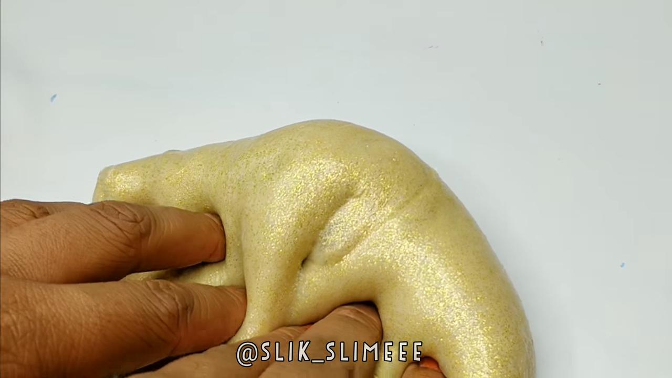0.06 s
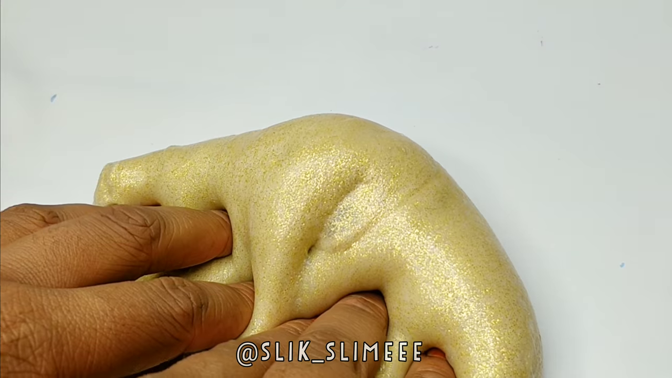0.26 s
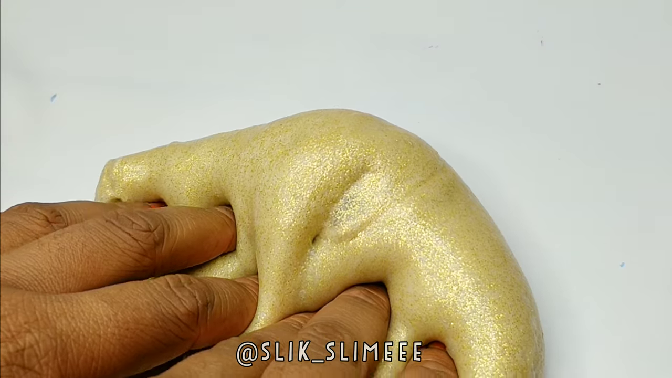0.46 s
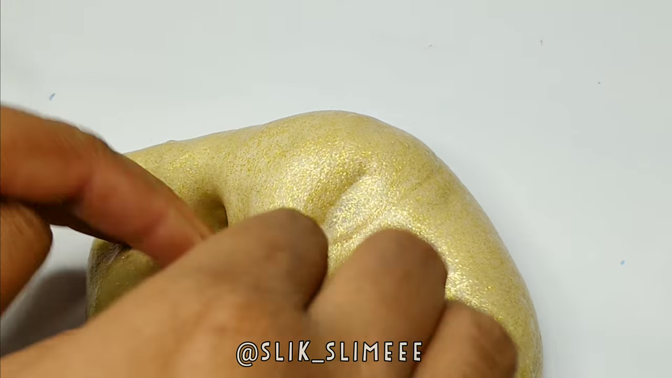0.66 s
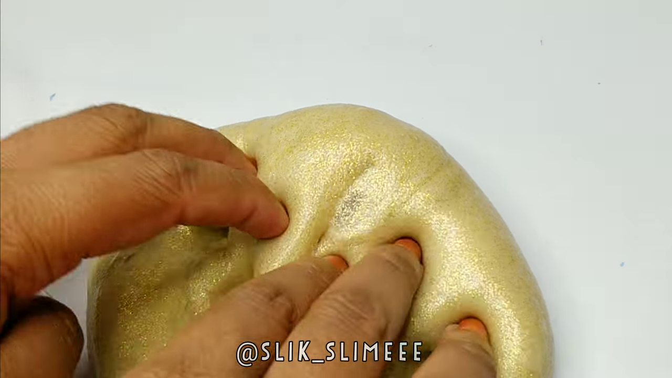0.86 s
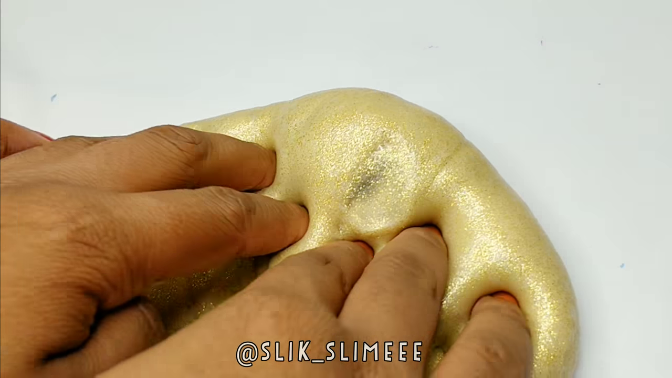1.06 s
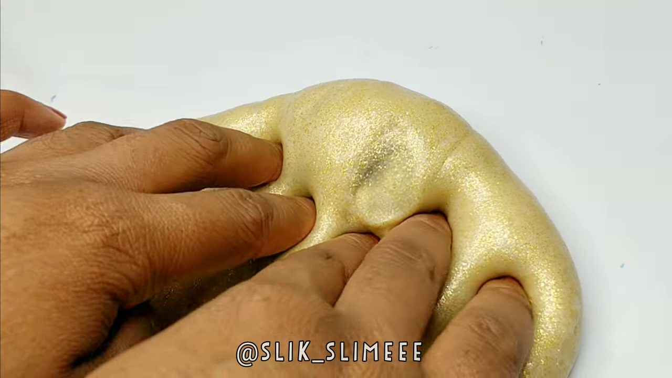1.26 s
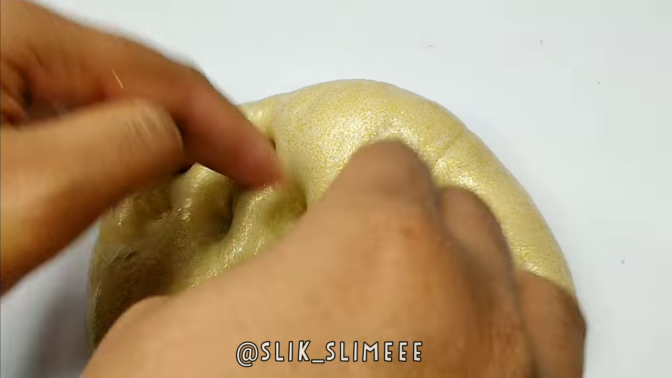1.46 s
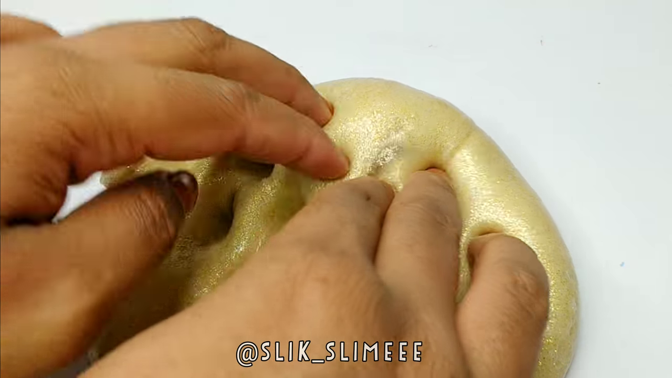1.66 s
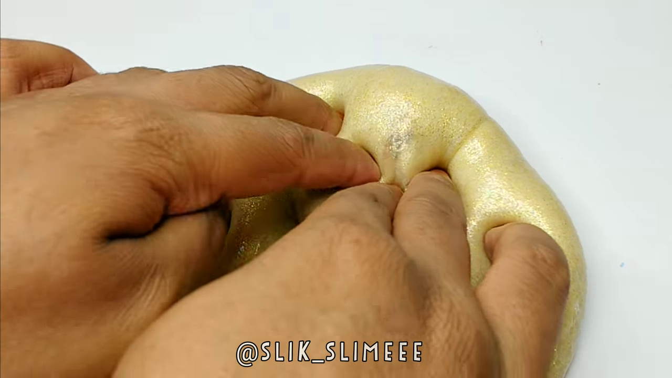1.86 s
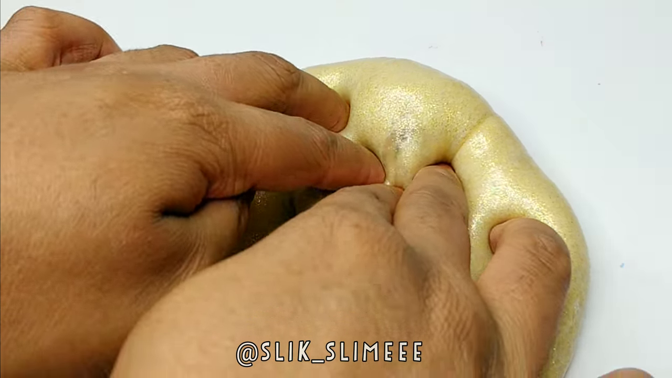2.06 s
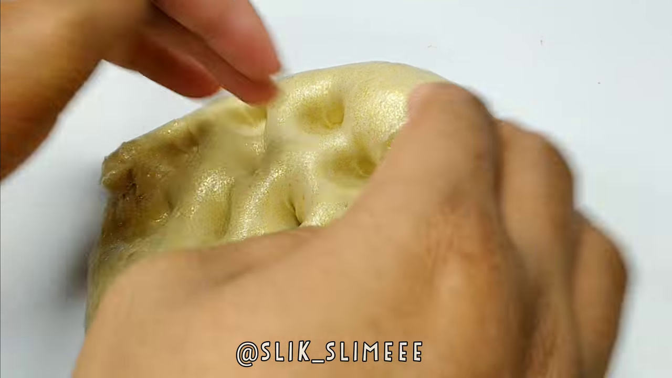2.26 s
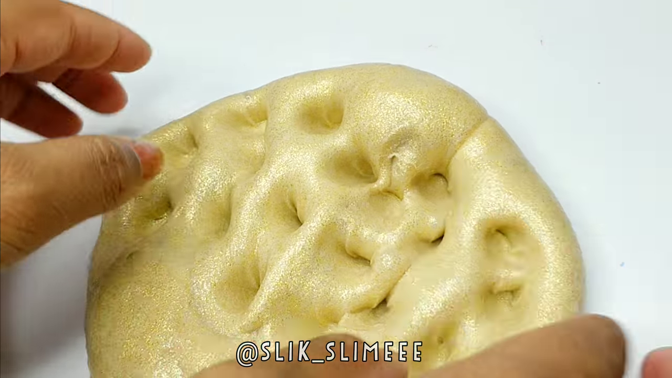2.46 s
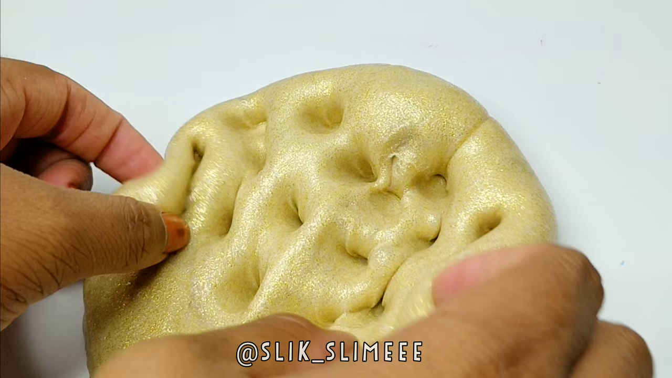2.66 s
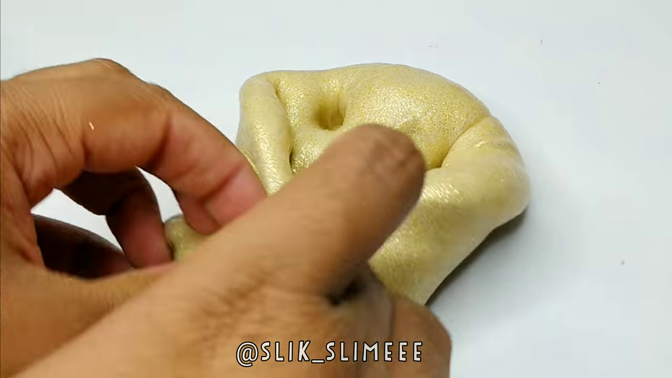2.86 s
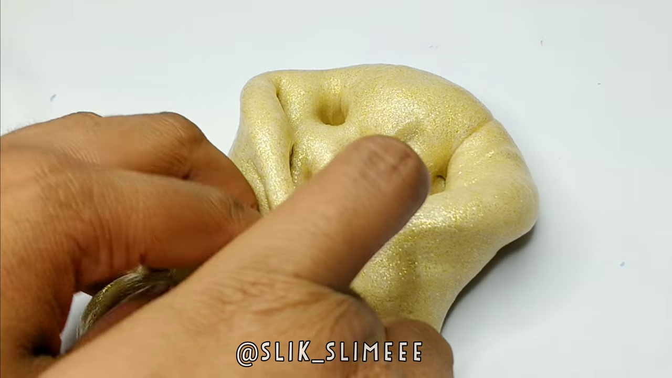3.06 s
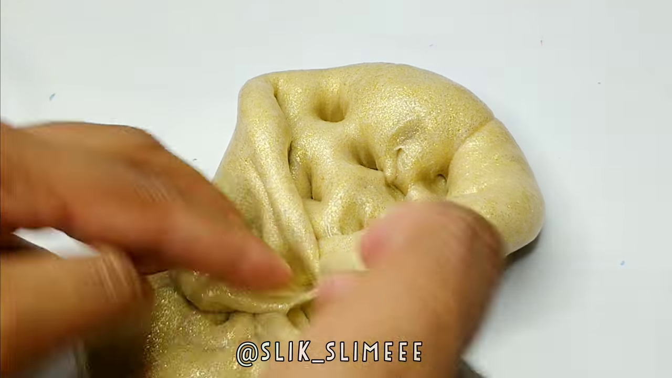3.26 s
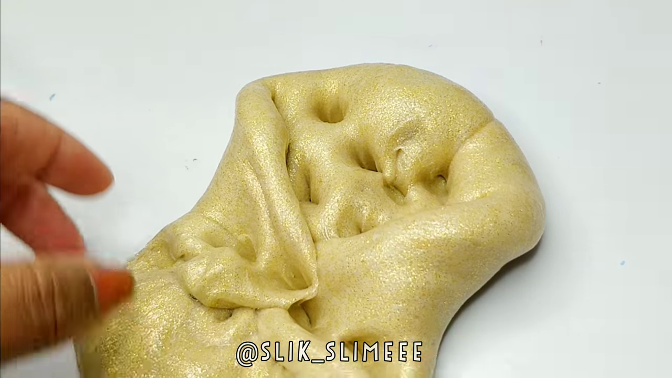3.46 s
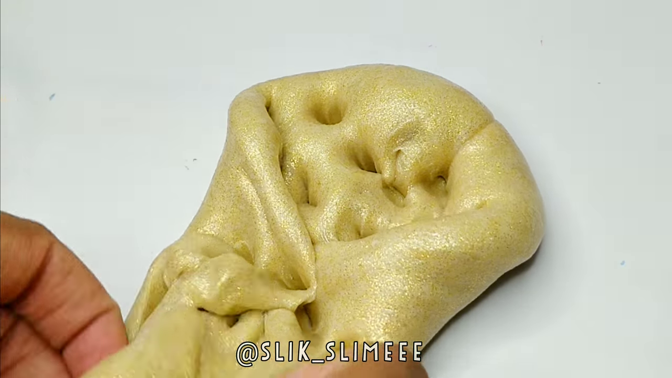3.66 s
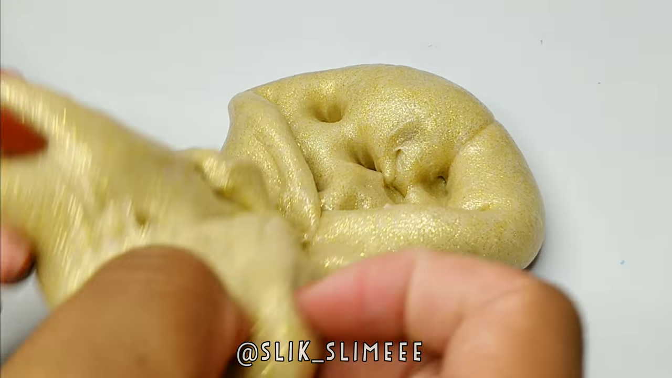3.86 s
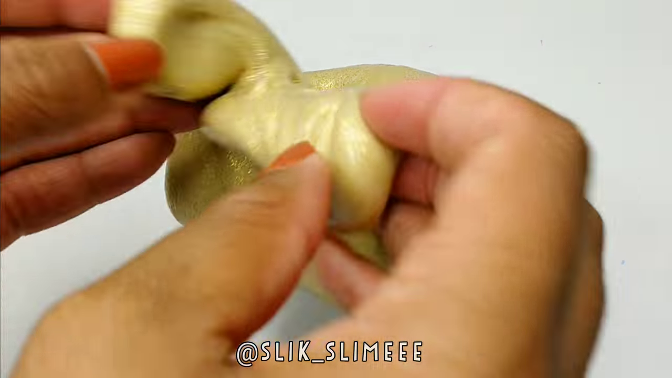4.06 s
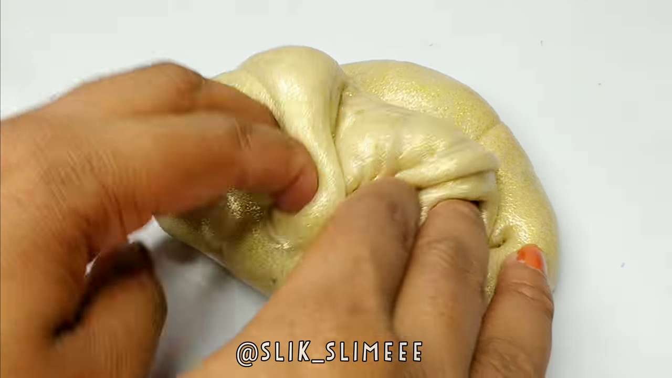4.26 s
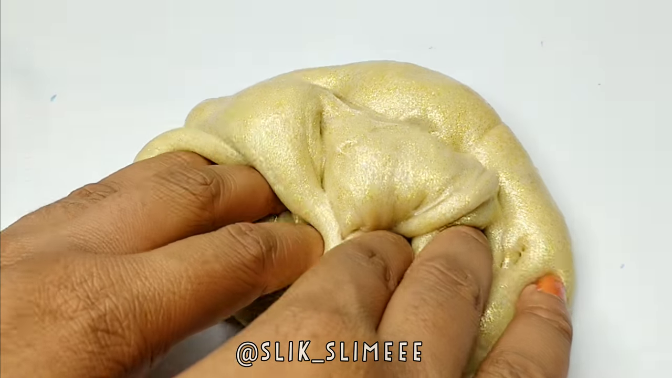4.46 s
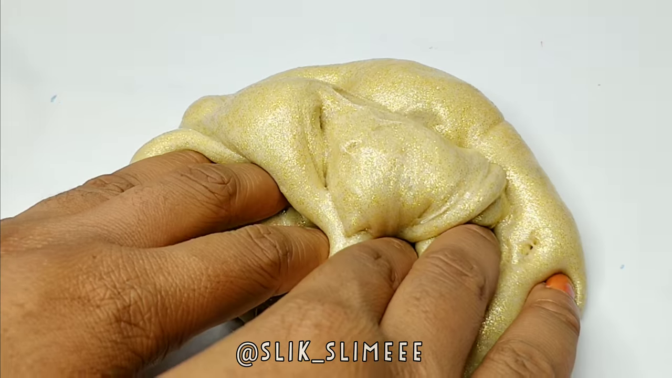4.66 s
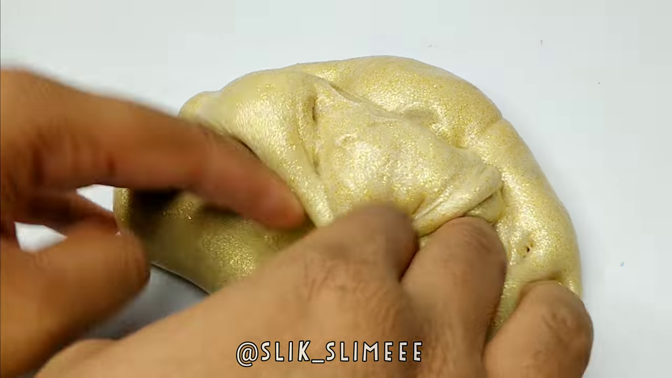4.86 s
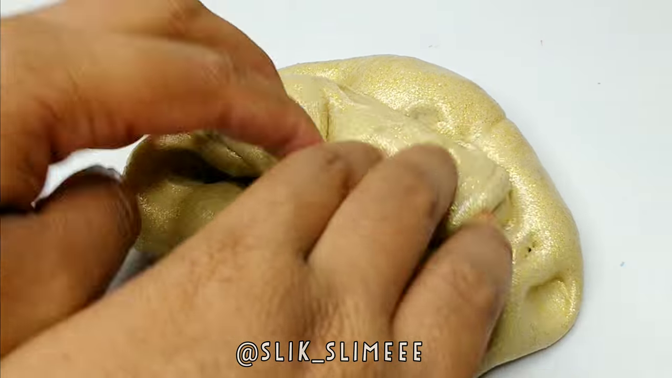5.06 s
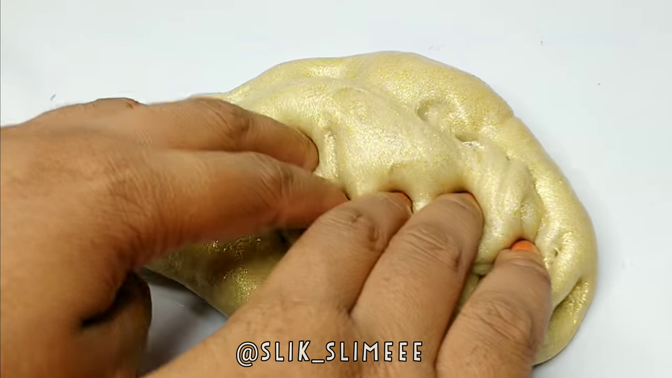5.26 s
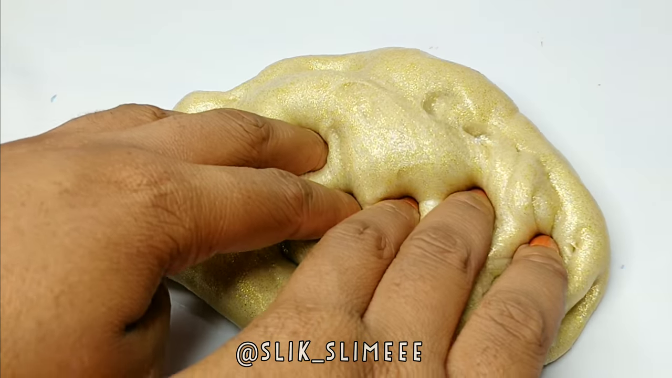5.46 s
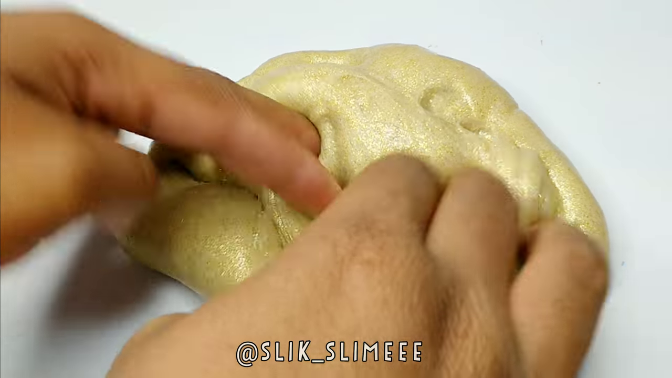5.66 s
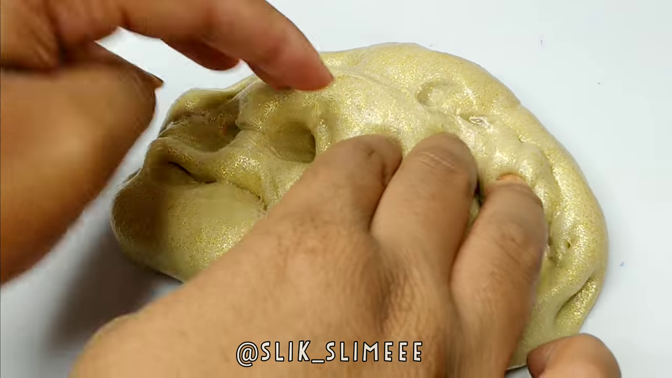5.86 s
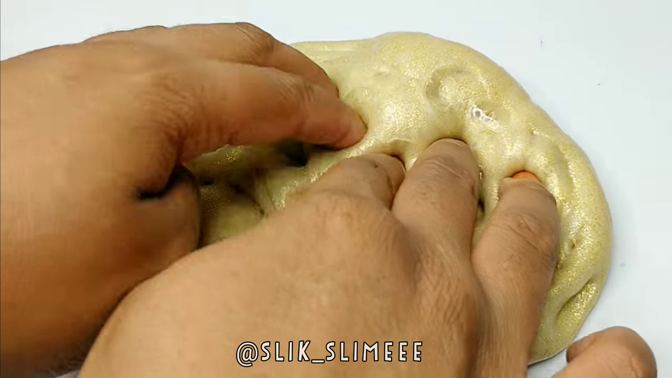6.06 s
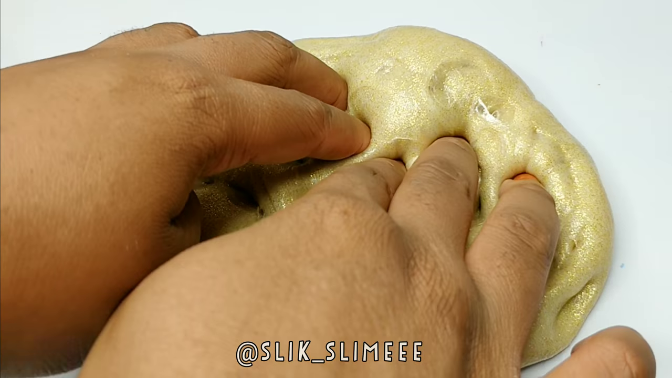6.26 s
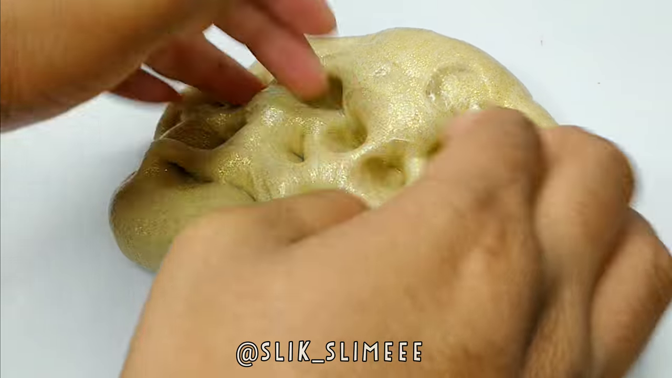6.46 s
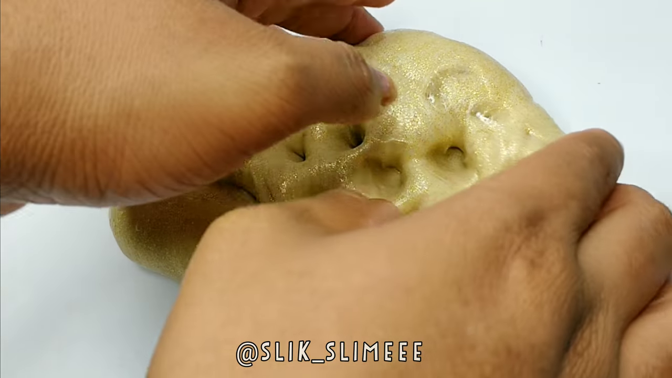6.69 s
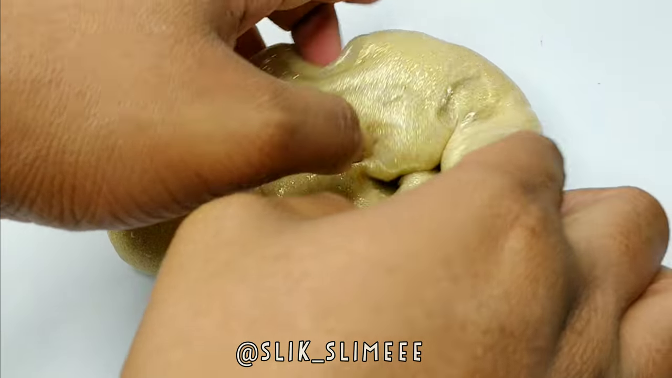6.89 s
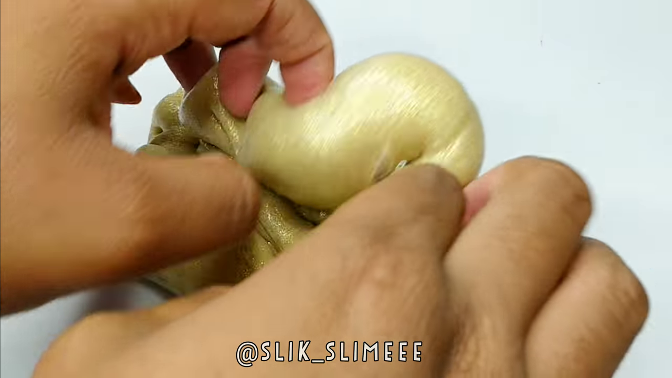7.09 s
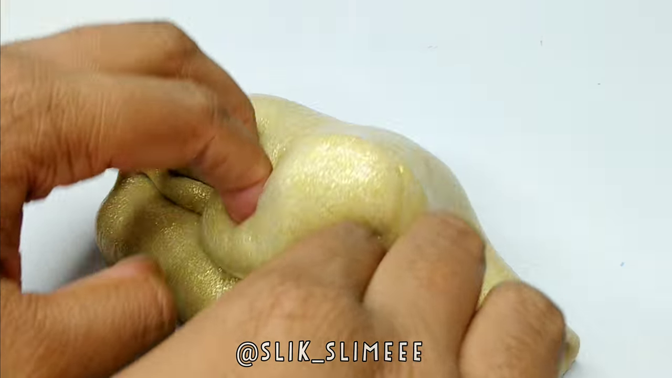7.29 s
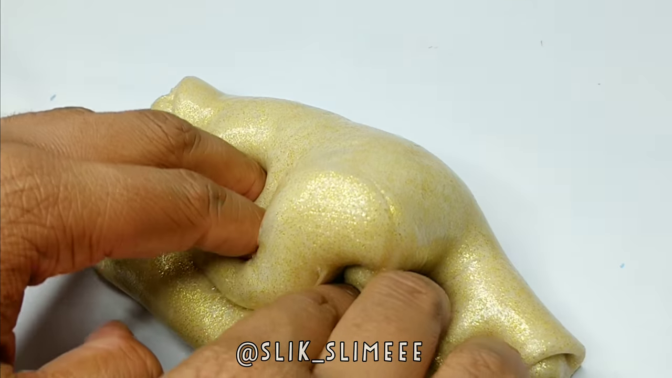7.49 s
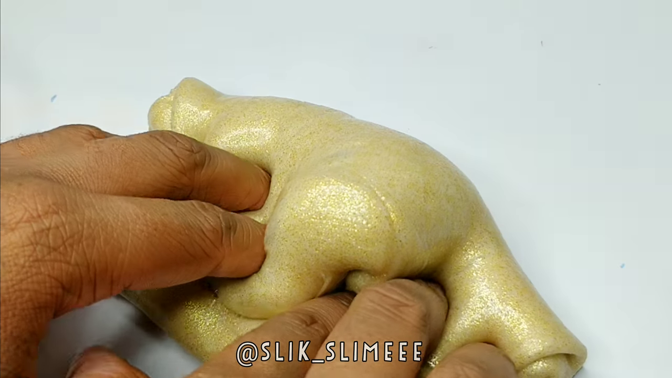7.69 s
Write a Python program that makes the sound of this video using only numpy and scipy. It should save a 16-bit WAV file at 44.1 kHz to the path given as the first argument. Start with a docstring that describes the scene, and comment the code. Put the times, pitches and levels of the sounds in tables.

```python
"""Fingers knead sticky slime on a table, close to a phone in a small room.
Each time they pull out, air pockets snap open, gulp air and thud the table: films crack and cavities ring.
Trapped bubbles tick under pressure, and soft squishes and a wet crackle of tiny bubbles fill in.
Between the pops the slime peels off the table and the skin with a soft fizz of snapping threads.
Underneath lies a faint steady rumble and hiss of filtered noise."""
import sys
import numpy as np
from scipy import signal
from scipy.fft import rfft, irfft
from scipy.io import wavfile
from scipy.ndimage import uniform_filter1d

SR = 44100
rng = np.random.default_rng(int(sys.argv[2]) if len(sys.argv) > 2 else 0)


def store_pcm(level_fs):
    """Save levels as 16-bit WAV."""
    pcm = np.round(np.clip(level_fs, -1, 1) * 32767).astype(np.int16)
    wavfile.write(sys.argv[1], SR, np.atleast_2d(pcm).T)


N = 340893  # length in samples

# A finger pulls free of its hole. Each row: start in seconds, length of the swell before it in seconds,
# starting bubble pitch in Hz, cycles the bubble rings, bubble level in dB, film crack level in dB,
# hole pitch in Hz before tuning, gulp level in dB, starting jolt pitch in Hz, table thud level in dB,
# left minus right in dB.
RELEASES = [(0.6867, 0.034, 4770, 3, -29, -61, 710, -30.5, 187, -26, 0),
            (0.717, 0.0092, 2900, 1.4, -29.5, -40.5, 477, -26.5, 172, -28, 1),
            (1.512, .032, 1730, 3.7, -38, -35, 640, -26.5, 190, -27, 11),
            (1.5472, 0.023, 2440, 1.03, -22.5, -33.5, 690, -26, 190, -26.5, 6),
            (2.2757, 0.019, 1970, 3.2, -41.5, -47, 776, -29, 380, -26, 9),
            (2.2999, 0.014, 1980, 1.5, -39, -45.5, 517, -32, 184, -34, 3),
            (2.3612, 0.034, 2260, 3.6, -59, -73, 364, -34.5, 165, -34, 8),
            (2.539, 0.0025, 2570, 22, -37, -46, 360, -36.5, 400, -64, -23.5),
            (2.5589, 0.0042, 3750, 2.3, -37.5, -55, 525, -30.5, 179, -38, 15.5),
            (3.192, 0.0025, 2080, 4.5, -46, -76, 440, -38, 180, -35.5, 5),
            (3.375, 0.014, 2100, 1.7, -36.5, -41.5, 950, -40, 177, -34.5, 8),
            (3.4082, .005, 2090, 2.5, -37.5, -34, 720, -41, 170, -35.5, 0),
            (3.6254, 0.0083, 3200, 2.3, -45, -64, 580, -33, 346, -66, 9),
            (4.2892, 0.0055, 3070, 6.2, -34, -37.5, 760, -36.5, 530, -41.5, -6.5),
            (4.9542, 0.007, 4310, 9, -21.5, -31.5, 660, -27, 215, -26, 9.5),
            (4.99, 0.043, 4350, 2, -25.5, -46.5, 970, -25.5, 360, -29, 4),
            (5.754, 0.0023, 4540, 3.5, -38, -41.5, 563, -28, 320, -28.5, 4.5),
            (5.8022, 0.011, 3360, 18, -38.5, -42, 746, -29.5, 168, -34.5, 2),
            (6.5027, 0.0066, 4450, 4.6, -43, -31, 740, -28, 337, -30, 3),
            (6.5367, 0.0028, 2350, 1.8, -28, -33, 935, -31, 189, -29.5, 10),
            (6.7369, 0.0055, 4800, 5, -41.5, -66, 565, -40, 274, -50, -14)]
BURST_S = .005  # burst levels are rms over this time
PORT_LAG_S = .00041  # longest travel time from one microphone port to the other
BEARING_DEG, BEARING_SPREAD_DEG = 28.3, 8.1  # the hands work left of the phone


def undb(db):
    """Turn decibels into gain."""
    return 10 ** (np.asarray(db) / 20)


def unit(x):
    """Scale to rms 1."""
    return x / np.sqrt(np.mean(x ** 2))


def burst(x, db):
    """Give a short sound its level, judged by its total energy."""
    return x * undb(db) * np.sqrt(BURST_S * SR / np.sum(x ** 2))


def add(out, s, x):
    """Mix x into out from time s in seconds."""
    i = max(int(s * SR), 0)
    out[..., i:i + x.shape[-1]] += x[..., :out.shape[-1] - i]


def along(points, hz):
    """Read between (Hz, value) points on a log-frequency axis."""
    f, value = np.transpose(points)
    return np.interp(np.log(hz + 1e-9), np.log(f), value)


def colour(x, points):
    """Filter with the given (Hz, dB) shape, never answering before the sound arrives."""
    size = 8192
    cepstrum = irfft(np.log(undb(along(points, np.fft.rfftfreq(size, 1 / SR)))))
    # folding the cepstrum onto its first half makes the filter minimum-phase
    cepstrum[1:size // 2] *= 2
    cepstrum[size // 2 + 1:] = 0
    response = irfft(np.exp(rfft(cepstrum)))
    response = response.reshape((1,) * (x.ndim - 1) + (-1,))
    return signal.fftconvolve(x, response, axes=-1)[..., :x.shape[-1]]


def diffuse(size, apart_hz=1300):
    """Noise from all sides: the two ports share the bass and differ in the treble."""
    mid, side = rfft(rng.standard_normal((2, size)))
    alike = .96 / (1 + (np.fft.rfftfreq(size, 1 / SR) / apart_hz) ** 2)
    mid = mid * np.sqrt((1 + alike) / 2)
    side = side * np.sqrt((1 - alike) / 2)
    return irfft(np.array([mid + side, mid - side]), size)


def ring(t, hz, cycles, glide):
    """A cavity swells within a cycle and rings down 60 dB; its pitch slides as it opens."""
    age = t * hz / cycles  # reaches 1 when the ring is 60 dB down
    swell = 1 - np.exp(-2 * t * hz)
    wave = np.sin(2 * np.pi * hz * t * (1 + glide * np.minimum(age, 1)))
    return -swell * wave * np.exp(-np.log(1000) * age)


def background():
    """A faint steady rumble and hiss: noise from all sides, strongest in the bass."""
    # Each row: frequency in Hz, level in dB.
    quiet_colour = [(20, -6.5), (27, 1), (36, -12), (50, -16.5), (100, -17), (210, -18), (320, -23),
                    (700, -26), (1400, -31), (3000, -32.5), (5500, -36), (9000, -41.5), (13000, -39),
                    (16000, -46.5)]
    return undb(-62) * unit(colour(diffuse(N), quiet_colour))


def room(x, tail_db=-1.5, near_db=5, near_s=0.0046):
    """Near surfaces answer first; the walls add a short tail that lasts longest in the bass."""
    # Decay of the walls. Each row: frequency in Hz, time to fall 60 dB in seconds.
    decay_times = [(100, 0.9), (250, 0.12), (600, 0.25), (1500, 0.28), (4000, 0.26), (12000, 0.21)]
    # Colour of the room's answer. Each row: frequency in Hz, level in dB.
    wall_colour = [(60, -39), (150, -6), (400, -9), (1000, -7.5), (2000, -5.5), (4500, -3.5), (8000, -3.5),
                   (12000, -1), (16000, -6.5)]
    size = int(SR / 2)
    t, hz = np.arange(size) / SR, np.fft.rfftfreq(size, 1 / SR)
    noise = rfft(diffuse(size))
    octave = np.round(np.log2(np.maximum(hz, 64)))
    tail = 0
    for band in np.unique(octave):
        fade = np.exp(-np.log(1000) * t / along(decay_times, 2 ** band))
        tail = tail + irfft(noise * (octave == band), size) * fade
    arrival = (1 - np.exp(-t / 0.0017)) * undb(near_db * np.exp(-t / near_s))
    response = colour(unit(tail) * arrival, wall_colour) / np.sqrt(size)
    return undb(tail_db) * signal.fftconvolve(x, response, axes=-1)[:, :N]


def scatter(x, db, spread_s):
    """The moving hands and the table top throw back each sound in a new way."""
    t = np.arange(int(SR / 40)) / SR
    reflections = diffuse(len(t)) * np.sqrt(t) * np.exp(-t / spread_s)
    echoes = signal.fftconvolve(x[None], reflections, axes=-1)
    # set the echo energy relative to the sound itself
    return undb(db) * echoes * np.sqrt(2 * np.sum(x ** 2) / np.sum(echoes ** 2))


def stroke(age, hold_s):
    """Gain of one drag: the pull builds up, holds, then the slime relaxes."""
    attack_s, release_db_per_s = 0.048, 115
    relaxed_s = np.maximum(age - attack_s - hold_s, 0)
    return np.clip(age / attack_s, 0, 1) * undb(-release_db_per_s * relaxed_s)


def pinholes(per_s=60):
    """Pinhead bubbles open in the peeling layer; each has its own size and place."""
    t, out = np.arange(int(SR / 50)) / SR, 0
    for hz in np.geomspace(1300, 7000, 11):
        # per_s counts the bubbles at each pitch
        hits = (rng.random(N) < per_s / SR) * rng.uniform(.2, 1, (2, N))
        bubble = ring(t, hz, cycles=9, glide=.1)
        out = out + signal.oaconvolve(hits, bubble[None], axes=-1)[:, :N]
    return unit(out)


def peeling(pinhole_db=-7, flutter_db=0.33):
    """In each drag threads snap over a dull rub; a short swell of fizz and rub leads into each release."""
    # The slime is dragged and peels.
    # Each row: start in seconds, hold in seconds, fizz level in dB, rub level in dB.
    strokes = [(0.0, 0.0072, -68.5, -76), (0.977, 0.19, -70.5, -72.5), (1.84, 0.075, -70.5, -78),
               (2.628, 0.2, -57.5, -60), (3.605, 0.029, -51.5, -50), (3.783, 0.12, -57.5, -66.5),
               (4.07, 0.14, -66.5, -91), (6.789, 0.31, -62.5, -59.5), (6.91, 0.018, -59.5, -57)]
    # Colour of the snapping threads. Each row: frequency in Hz, level in dB.
    fizz_colour = [(500, -11.5), (1000, -13), (1800, -11.5), (3000, -4), (4500, -6), (6500, -12.5),
                   (9000, -13.5), (11500, -10), (14000, -19), (16000, -43)]
    # Colour of the rubbing mass. Each row: frequency in Hz, level in dB.
    rub_colour = [(35, -51), (70, 9), (110, 4.5), (210, 4), (400, -2.5), (800, -3.5), (1600, -12.5),
                  (3000, -48)]
    threads_per_s, thread_spread_db = 8000, 2
    swell_db = [-19.5, -18]  # fizz and rub of the swell, relative to the gulp
    now, gains = np.arange(N) / SR, np.zeros((2, N))
    for s, hold_s, fizz_db, rub_db in strokes:
        drag = np.outer(undb([fizz_db, rub_db]), stroke(now - s, hold_s))
        gains = np.hypot(gains, drag)
    for s, lead_s, _, _, _, _, _, gulp_db, *_ in RELEASES:
        # the swell fades out by the release
        swell = undb(gulp_db) * np.hanning(int(lead_s * SR))
        add(gains, s - lead_s, np.outer(undb(swell_db), swell))
    # a few threads are much stronger than the rest
    sizes = undb(thread_spread_db * np.minimum(rng.exponential(size=N), 6))
    threads = (rng.random(N) < threads_per_s / SR) * sizes * rng.standard_normal((2, N))
    grain = unit(colour(threads, fizz_colour)) + undb(pinhole_db) * pinholes()
    # the peeling front catches and slips
    flutter = unit(uniform_filter1d(rng.standard_normal(N), size=700))
    fizz_gain, rub_gain = gains * undb(flutter_db * flutter)
    return fizz_gain * grain + rub_gain * unit(colour(diffuse(N), rub_colour))


def squishes(cycles=5):
    """A little air slips along a resting finger: a soft blip with no crack."""
    # Each row: start in seconds, starting pitch in Hz, level in dB.
    blips = [(3.293, 490, -56.5), (3.934, 720, -54), (4.515, 860, -54.5), (4.575, 766, -57.5),
             (5.452, 510, -60), (5.868, 870, -48), (6.2, 580, -53.5), (6.97, 1400, -52)]
    out, t = np.zeros(N), np.arange(int(SR / 20)) / SR
    for s, hz, db in blips:
        add(out, s, burst(ring(t, hz, cycles, glide=0.093), db))
    return out


def squelch(crackle_db, spread_s, centre_hz, octaves, count):
    """After each release the hole's wet wall comes apart in tiny bubbles, the late ones weakest."""
    out, t = np.zeros((2, N)), np.arange(int(SR / 100)) / SR
    for s, _, _, _, bubble_db, _, _, gulp_db, *_ in RELEASES:
        suction_db = (bubble_db + gulp_db) / 2
        for when, pitch, size, place in np.clip(rng.standard_normal((count, 4)), -2, 2):
            hz = min(centre_hz * 2 ** (octaves * pitch), SR / 4)
            level_db = suction_db + crackle_db + 3 * size - 4 * abs(when)
            bubble = burst(ring(t, hz, cycles=4, glide=.1), level_db)
            sides = undb([2 * place, -2 * place])
            add(out, s + spread_s * abs(when), np.outer(sides, bubble))
    return out


def thuds(low_hz=68):
    """Each release jolts the soft mass; the table's modes ring, struck in another place each time."""
    # Low modes of the table. Each row: frequency in Hz before a small random shift,
    # level in dB before a random change.
    table_modes = [(82, 0.5), (99, 5.5), (124, -8), (160, -3.5), (191, 2), (207, -9.5), (315, -18),
                   (374, -2)]
    t60_at_100_hz, swell_s = 0.22, 0.011  # seconds
    recoil_db = -7.5  # recoil of the soft mass, relative to the gulp
    out, t = np.zeros((2, N)), np.arange(int(SR / 2)) / SR
    mode_hz, mode_db = np.transpose(table_modes)[:, :, None]
    # the slime damps the higher modes faster
    t60 = t60_at_100_hz * (mode_hz / 100) ** -.3
    fade = np.exp(-np.log(1000) * t / t60) * (1 - np.exp(-t / swell_s))
    lag_s = PORT_LAG_S * np.sin(np.radians(BEARING_DEG))
    for s, *_, gulp_db, jolt_hz, thud_db, _ in RELEASES:
        place, load = rng.standard_normal((2, len(table_modes), 1))
        waves = np.sin(2 * np.pi * mode_hz * (1 + 0.018 * load) * t)
        modes = np.sum(undb(mode_db + 2 * place) * fade * waves, axis=0)
        jolt = burst(ring(t, jolt_hz, cycles=5.0, glide=0.14), gulp_db + recoil_db)
        thud = burst(modes, thud_db) + jolt
        for ear in range(2):
            add(out[ear], s + ear * lag_s, thud)
    # so small a surface radiates no deep bass
    return signal.sosfilt(signal.butter(4, low_hz, "high", fs=SR, output="sos"), out)


def tear(t, spread_s, share, count=30):
    """One main rupture, then a spray of small rips as the film gives way."""
    rips = np.zeros(len(t))
    late = np.minimum(rng.exponential(spread_s, count) * SR, len(t) - 1).astype(int)
    rips[late] = share * rng.standard_normal(count) / np.sqrt(count)
    rips[0] = 1
    return rips


def pockets():
    """List every air pocket that opens, by a finger pulling free or a trapped bubble bursting."""
    # A trapped bubble bursts under pressure. Each row: start in seconds, starting bubble pitch in Hz,
    # bubble level in dB, film crack level in dB, gulp level in dB, left minus right in dB.
    ticks = [(0.2154, 4730, -59, -72, -65, 6), (1.163, 4040, -61, -51.5, -65, 10),
             (1.531, 1900, -60, -50, -33, 6), (1.7324, 3050, -45.5, -54.5, -51, 9),
             (1.8602, 1760, -60.5, -77, -56, 6), (2.2818, 4000, -39.5, -58, -35, 3),
             (2.336, 1900, -49.5, -53, -43, -2), (3.0679, 6000, -66, -54.5, -58.5, 1),
             (3.388, 2200, -43, -46, -53, 11), (3.6095, 3560, -46.5, -53, -38.5, 6),
             (3.856, 3600, -48, -52.5, -38.5, 8), (4.2249, 4300, -45, -41.5, -44, -5),
             (4.3546, 5200, -37.5, -44.5, -47.5, 11.5), (4.36, 5000, -35, -39, -53, -4),
             (4.4797, 3960, -53.5, -66, -54, 6), (4.745, 6000, -79, -61.5, -84, 2),
             (5.2152, 3500, -49, -57, -58, 13.5), (5.4263, 4370, -52, -58, -75, 14.5),
             (5.789, 4130, -41.5, -47, -41, 1), (5.857, 4400, -46, -50.5, -38.5, 5),
             (5.948, 2820, -59.5, -59.5, -75, 3), (6.04, 5000, -71, -58, -73, 0),
             (6.0685, 4540, -42.5, -40, -45, 3), (6.494, 5450, -54, -49, -35.5, 9),
             (6.73, 2900, -42, -55, -47, 11), (7.3116, 4960, -45.5, -47.5, -52, 13),
             (7.3642, 3160, -43, -46.5, -44, 6), (7.4487, 4050, -39, -52.5, -45, 12.5),
             (7.5891, 2610, -56.5, -60.5, -55, 6), (7.695, 4600, -47, -54, -82, 9)]
    base_cycles, cycles_per_db = 3.3, 0.3  # the less its film tears, the longer it rings
    crater_hz = 720  # the small hole that it leaves, before tuning
    tick_room_db = -0.5  # ticks are shaded by the hand
    for s, _, hz, cycles, bubble_db, crack_db, hole_hz, gulp_db, _, _, pan_db in RELEASES:
        yield s, hz, cycles, bubble_db, crack_db, hole_hz, gulp_db, pan_db, 0
    for s, hz, bubble_db, crack_db, gulp_db, pan_db in ticks:
        cycles = max(base_cycles + cycles_per_db * (bubble_db - crack_db), 2)
        yield s, hz, cycles, bubble_db, crack_db, crater_hz, gulp_db, pan_db, tick_room_db


def pops(gulp_cycles=2.66, gulp_late_s=0.00035, hole_ratio=0.95,
         overtone_ratio=2.15, overtone_db=-10, twin_ratio=1.65, twin_db=-9):
    """The film cracks, the bubble and a smaller neighbour ring, and air rushes into the hole."""
    # Colour of the tearing film. Each row: frequency in Hz, level in dB.
    crack_colour = [(1500, -9), (4000, -0.5), (7000, 2), (11000, 1.5), (14000, -4), (16000, -4.5)]
    # What goes out to the room: bubble in dB, crack in dB, gulp in dB.
    send_db = (-1, 3, 2)
    out, sent, t = np.zeros((2, N)), np.zeros(N), np.arange(int(SR / 20)) / SR
    for s, ring_hz, cycles, ring_db, crack_db, hole_hz, gulp_db, pan_db, room_db in pockets():
        twin = undb(twin_db) * ring(t, ring_hz * twin_ratio, cycles, glide=0.1)
        bubble = burst(ring(t, ring_hz, cycles, glide=0.041) + twin, ring_db)
        crack = burst(colour(tear(t, spread_s=0.00064, share=1.9), crack_colour), crack_db)
        snap = bubble + crack
        hole = ring(t, hole_hz * hole_ratio, gulp_cycles, glide=0.22)
        overtone = undb(overtone_db) * ring(t, hole_hz * overtone_ratio, cycles=4.2, glide=0.041)
        gulp = burst(hole + overtone, gulp_db)
        bearing = BEARING_DEG + BEARING_SPREAD_DEG * rng.uniform(-1.1, 1)
        lag_s = PORT_LAG_S * np.sin(np.radians(bearing))
        # the left port hears it first; only the snap differs in level between the ports
        for ear, side in enumerate((1, -1)):
            add(out[ear], s + ear * lag_s, snap * undb(side * pan_db / 2))
            add(out[ear], s + ear * lag_s + gulp_late_s, gulp)
        add(out, s, scatter(snap, db=-2.0, spread_s=.0018))
        add(out, s, scatter(gulp, db=-5.5, spread_s=.003))
        add(sent, s, undb(room_db) * undb(send_db) @ np.array([bubble, crack, gulp]))
    return out, sent  # sound at the two ports, sound sent to the room


def scene():
    """Pops and squishes in the room, wet crackle, table thuds, peeling and the faint background."""
    close, sent = pops()
    soft = squishes()
    crackle = squelch(crackle_db=-23.5, spread_s=.016, centre_hz=1900, octaves=0.96, count=22)
    slurp = squelch(crackle_db=-17, spread_s=.018, centre_hz=661, octaves=0.43, count=8)
    air = close + soft + room((sent + soft)[None])
    # small air pockets radiate little bass
    air = signal.sosfilt(signal.butter(2, 75, "high", fs=SR, output="sos"), air)
    return air + crackle + slurp + thuds() + peeling() + background()


def record(dry):
    """The phone cuts the top: a steep low-pass filter at 15800 Hz."""
    return signal.sosfilt(signal.ellip(8, .2, 70, 15800, fs=SR, output="sos"), dry)


dry = scene()
out = record(dry)
store_pcm(out)
```